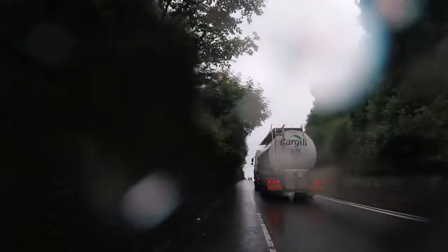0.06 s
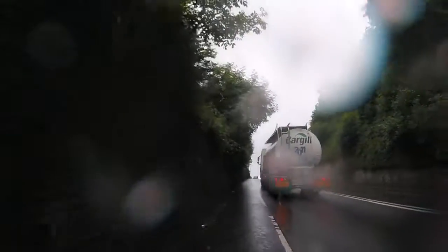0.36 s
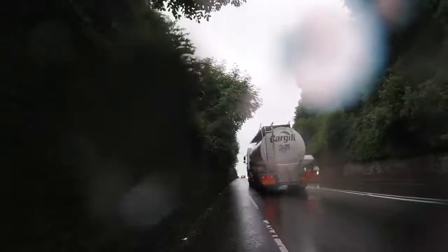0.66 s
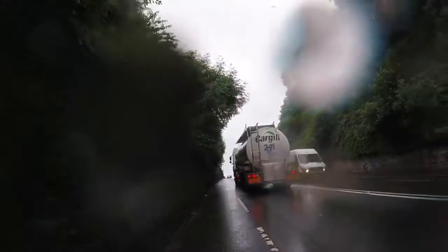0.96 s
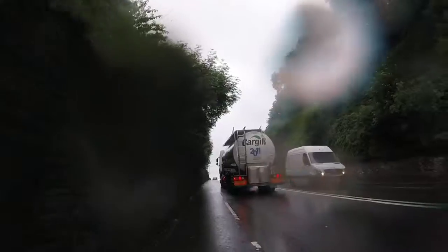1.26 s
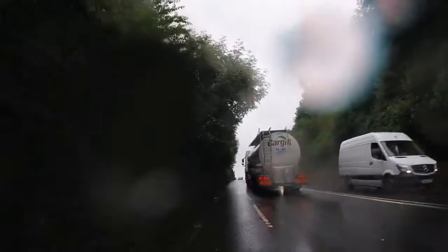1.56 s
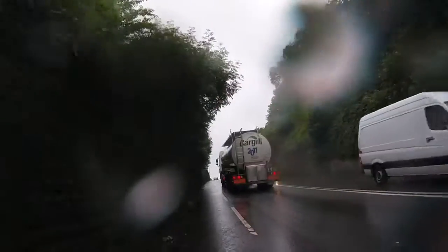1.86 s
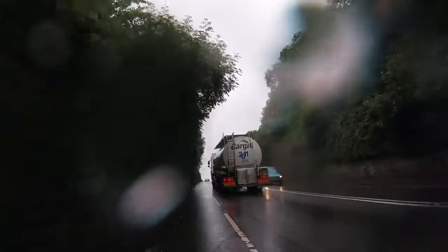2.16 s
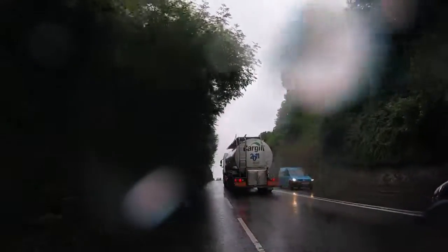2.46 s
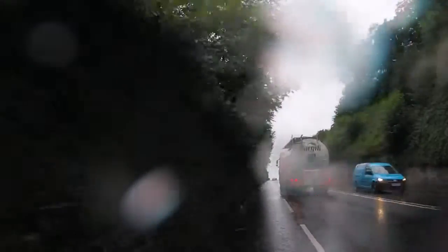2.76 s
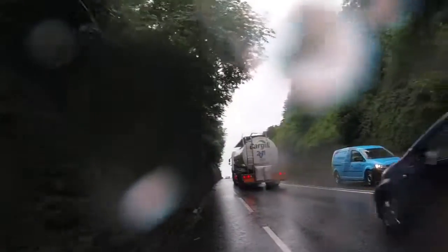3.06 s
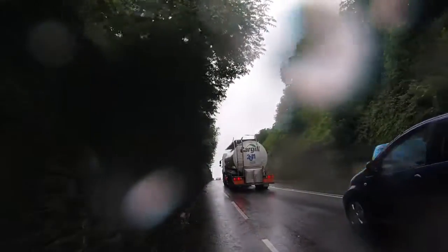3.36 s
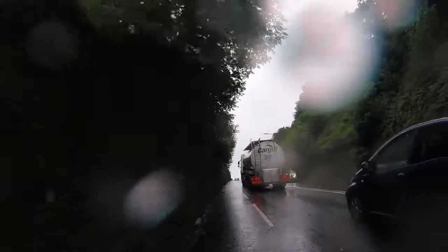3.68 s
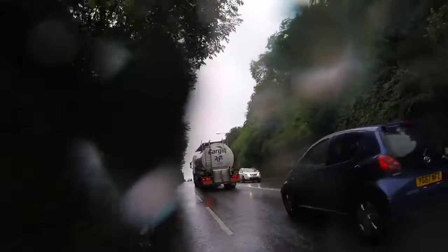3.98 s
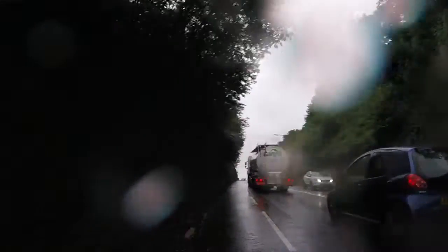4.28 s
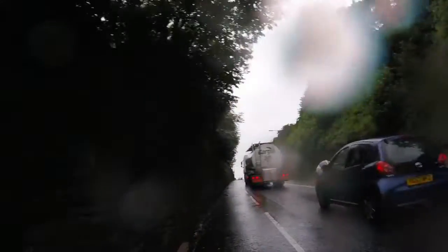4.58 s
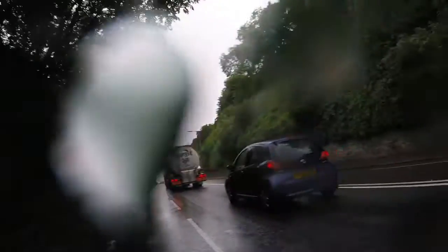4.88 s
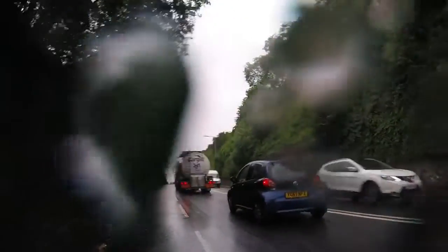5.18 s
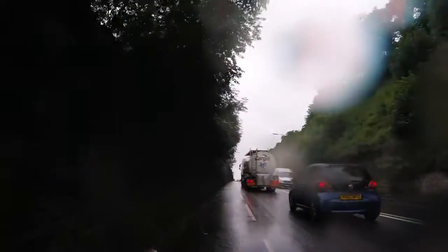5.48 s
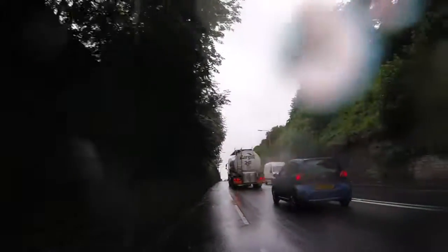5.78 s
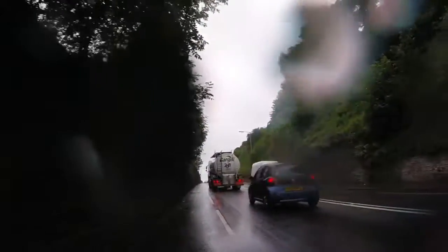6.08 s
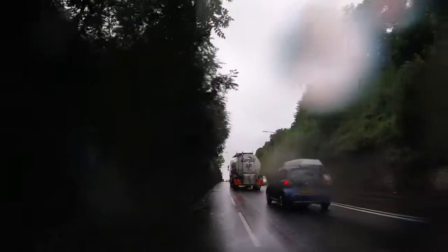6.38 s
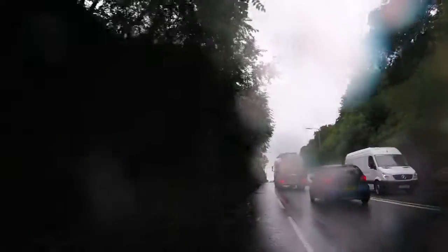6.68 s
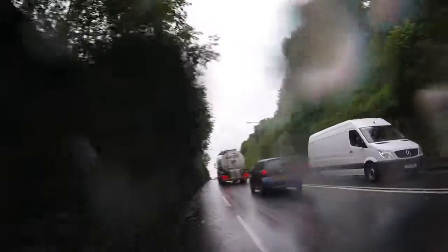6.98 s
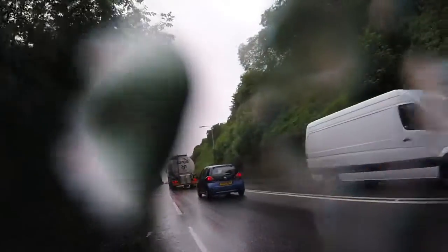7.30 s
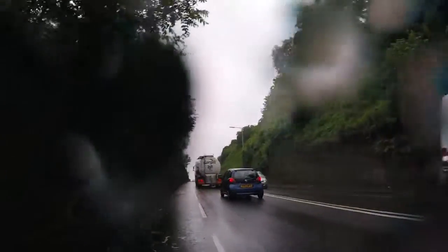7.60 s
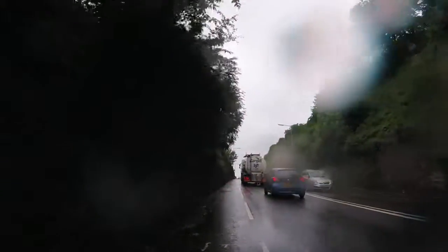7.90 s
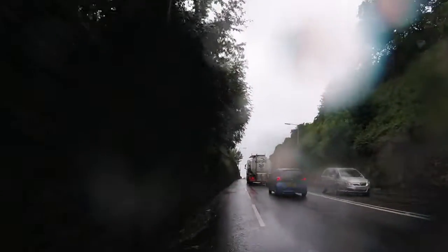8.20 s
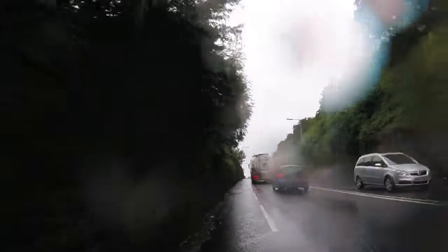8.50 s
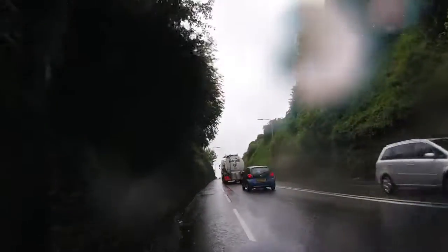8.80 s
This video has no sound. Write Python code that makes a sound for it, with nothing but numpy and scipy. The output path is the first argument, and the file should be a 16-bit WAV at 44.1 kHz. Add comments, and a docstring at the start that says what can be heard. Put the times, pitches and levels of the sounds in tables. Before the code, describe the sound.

Tyres hiss and roar by on wet asphalt over the throbbing low drone, bumps and wind noise of a bike ride.

```python
"""Wet road in rain, from a camera microphone on a moving bicycle. From the start rough asphalt makes the
frame rumble and the camera mount drone, wind buffets the microphone, and a lorry's tyres roar ahead.
A raindrop hits the housing at 1.8 s as a van passes close; bumps thump at 2.2 s and the level dips.
A small van and cars follow, throwing hissing spray, a big car very close at 5.5 s. Around 7 s come
a second drop, a long van and more bumps with another dip; two last cars go by."""
import sys
import numpy as np
from scipy import signal
from scipy.fft import rfft, irfft, next_fast_len
from scipy.io import wavfile
from scipy.ndimage import uniform_filter1d, minimum_filter1d, map_coordinates

SR = 44100
rng = np.random.default_rng(int(sys.argv[2]) if len(sys.argv) > 2 else 0)


def waveform_to_disk(signal):
    """Save audio, clipped to [-1, 1], as 16-bit WAV at the path in sys.argv[1]."""
    frames = np.transpose(np.atleast_2d(signal))
    scaled = np.clip(frames, -1, 1) * 32767
    samples = np.round(scaled).astype(np.int16)
    wavfile.write(sys.argv[1], SR, samples)


N = 399105
TIME = np.arange(N) / SR

# low end of the ride: t/s, relative wind level/dB, relative frame level/dB
RIDE_LEVELS = [(0.0, -17.5, -22), (0.4, -17, -16), (0.64, -13, -21.5), (0.95, -15.5, -17.5),
               (1.15, -23, -17), (1.68, -19, -24.5), (2.24, -22.5, -17.5), (2.48, -19, -27),
               (2.64, -25.5, -18.5), (3.12, -19, -19), (3.6, -21.5, -26), (3.76, -23, -14.5),
               (4.8, -18, -19), (6.4, -19, -19), (7.0, -21, -22.5), (7.2, -19.5, -18), (7.44, -29.5, -34),
               (7.8, -23, -23), (8.3, -24.5, -24), (8.65, -23.5, -23.5), (9.05, -22, -22.5)]
# gusts and lulls on the microphone: t/s, half length/s, lift/dB
WIND_GUSTS = [(0.55, 0.046, 3.5), (1.72, .07, 4), (3.52, 0.038, 5), (5.38, 0.041, 6), (5.48, 0.035, -13),
              (6.07, 0.042, 2.5), (6.5, 0.059, 1.5), (8.65, 0.073, 4)]
# eddies on the microphone: t/s, half length/s, level/dB
WIND_EDDIES = [(0.3, 0.046, -22), (0.74, .05, -17.5), (0.95, .04, -24), (3.158, 0.049, -19),
               (5.37, .04, -25), (8.58, .06, -33)]
# spectra of the head wind and of the eddies: f/Hz, relative density/dB
WIND_SPECTRUM = [(10, -31), (22, -12.5), (32, -13), (45, -12), (55, -4), (66, -0.5), (77, -13.5),
                 (105, -19.5), (125, -9), (148, -20), (175, -8), (300, -35.5), (800, -73)]
EDDY_SPECTRUM = [(12, -21), (24, -4), (36, 0), (50, -12), (90, -24), (300, -44)]
# resonances of the bicycle frame: f/Hz, width/Hz, relative level/dB
FRAME_MODES = [(99.4, 5.4, -2.5), (113.3, 15, -7.5)]
# ripples in the road that shake the frame: t/s, half length/s, lift/dB
FRAME_SHUDDERS = [(0.41, 0.036, 7), (1.217, 0.056, 3), (1.45, 0.061, 13), (1.93, .045, 6), (2.7, .05, 1),
                  (3.39, 0.041, 8), (5.1, .1, 4), (6.12, .04, 4.5), (6.32, .04, 6), (6.77, 0.071, 10),
                  (8.5, .04, 4)]
# raindrops on the camera housing: t/s, splat level/dB, ring level/dB, ring f/Hz
RAINDROPS = [(1.8211, -13, -11, 6550), (6.8256, -10.5, -10.5, 6750)]
# tyres going by, a row per vehicle, axle or trail of spray: closest t/s, half length/s, roar f/Hz,
# whine f/Hz, whine width/Hz, then level/dB when closest of roar, whine, rumble, spray and mist
TYRE_PASSES = [(0.119, .3, 900, 908, 170, -45.5, -51, -35, -35, -52),
               (0.618, .24, 900, 881, 172, -43, -47.5, -33.5, -33.5, -51.5),
               (1.25, .16, 860, 862, 130, -40, -36, -45, -33.5, -53),
               (1.6, .16, 900, 890, 110, -40, -33.5, -44, -34.5, -49),
               (1.86, .17, 1100, 1050, 199, -35, -34, -38, -31.5, -47.5),
               (2.06, .14, 950, 885, 120, -38, -34, -38, -38, -53.5),
               (2.68, .22, 900, 832, 110, -42, -35.5, -39, -40, -64),
               (3.08, .28, 1099, 894, 149, -39.5, -40.5, -40.5, -37, -57),
               (4.08, .32, 1051, 1082, 155, -38, -38, -31.5, -31.5, -55.5),
               (4.532, .24, 1081, 1067, 85, -41, -32.5, -48.5, -33.5, -57),
               (4.86, 0.1202, 1000, 1077, 100, -44, -44.5, -39, -34, -56),
               (5.2, .1, 1150, 1093, 170, -35, -33, -33, -31, -47.5),
               (5.46, .2, 1070, 1052, 154, -33.5, -31, -33, -30, -40),
               (5.799, .18, 900, 929, 140, -35, -32.5, -31.5, -32, -59.5),
               (6.06, .14, 1050, 981, 120, -36, -34.5, -34.5, -35, -50.5),
               (6.23, .16, 1110, 1169, 150, -38, -35, -39, -36, -51),
               (6.65, .18, 950, 942, 140, -37.5, -34.5, -36, -34.5, -53),
               (7.0, .16, 1150, 1452, 130, -37.5, -38.5, -33.5, -37.5, -52.5),
               (7.781, .27, 800, 759.5, 140, -40, -36, -50.5, -45, -56),
               (8.3, .22, 1200, 1100, 220, -42, -41, -55, -55, -62),
               (8.951, .2, 852, 692, 150, -37.5, -41.5, -40.5, -39, -50)]
# spectra of tyre rumble, spray and fine mist: f/Hz, relative density/dB
RUMBLE_SPECTRUM = [(120, -30), (280, -1.5), (325, -7.5), (368, 4), (405, -0.5), (437, 3.5), (470, 0),
                   (570, -3.5), (680, -5), (850, -4), (1400, -9), (3000, -41.5)]
SPRAY_SPECTRUM = [(300, -25.5), (700, -4.5), (1300, -2), (1650, 1.5), (2200, 1), (3000, -0.5), (4100, -4),
                  (5100, -3.5), (5800, -1), (6200, -7.5), (6500, -4), (7000, -14), (8500, -21),
                  (11000, -51.5)]
MIST_SPECTRUM = [(3000, -21.5), (6000, 2), (7700, -1.5), (8700, -5), (10000, -12.5), (11100, -16.5),
                 (11800, -43.5), (14000, -79.5)]
# bumps under the bicycle: t/s, ring gain/dB, scuff gain/dB, tilt/(dB per octave)
ROAD_BUMPS = [(2.135, -6.5, -19, 0), (2.183, -1, 0, 1), (2.212, 4, -3, 0), (4.677, -4, -24, -11),
              (6.904, -1.5, -17, -7), (7.166, 3.5, 5, 0)]
# the mount's ring after a bump: f/Hz, relative level/dB, t60/s
THUMP_MODES = [(99, -24, 0.053), (218.7, 3.5, 0.11), (250.2, -9, 0.054), (378, -16.5, 0.094),
               (434, -24.5, 0.16), (890, -37, 0.053)]
# main and upper resonances of the camera mount: f/Hz, width/Hz, relative level/dB
MOUNT_MODES = [(207.2, 10.7, 2), (220.2, 15.2, -6)]
UPPER_MODES = [(234.9, 10.6, 0), (275.5, 11.8, 0)]
# the mount's drone on ordinary asphalt: t/s, level/dB
DRONE_LEVELS = [(0.0, -28), (0.24, -20.5), (0.7, -21.5), (1.1, -21.5), (1.5, -20), (1.68, -25.5),
                (1.84, -20.5), (2.08, -21.5), (2.26, -20), (2.55, -22), (3.02, -24), (3.3, -20), (4.5, -20),
                (5.4, -20), (5.85, -21), (6.24, -15.5), (6.8, -17), (6.97, -23.5), (7.22, -15), (7.47, -25),
                (7.9, -21.5), (8.3, -19.5), (9.04, -19)]
# ringing of its upper resonances: t/s, relative level/dB of the lower one, of the higher one
UPPER_LEVELS = [(0.0, -28, -28), (0.28, -18, -30), (0.45, -23, -30), (1.0, -25.5, -32.5), (1.5, -28, -31),
                (2.2, -27, -27.5), (2.6, -22.5, -39.5), (2.95, -30.5, -31), (3.28, -18, -32),
                (3.7, -26, -44), (4.05, -21.5, -29.5), (4.3, -18, -32), (4.8, -23.5, -34), (5.1, -20, -28),
                (5.38, -16.5, -29), (5.65, -23, -26), (6.25, -20.5, -31.5), (6.6, -23.5, -28.5),
                (7.2, -27, -26.5), (7.6, -33, -37), (7.85, -32, -38), (8.05, -30, -29), (8.6, -30, -33),
                (9.0, -22.5, -32)]
# rough asphalt that makes the mount hum: t/s, half length/s, level/dB, f/Hz
ROUGH_PATCHES = [(0.083, 0.02, -13.5, 210.7), (0.273, 0.019, -11, 221.7), (0.392, 0.03, -12, 200.9),
                 (0.57, 0.019, -17, 208.3), (0.631, 0.016, -13, 218.8), (0.723, 0.027, -14, 208),
                 (0.849, 0.021, -11.5, 207.2), (0.956, 0.031, -13, 213.3), (1.22, 0.044, -10.5, 208.8),
                 (1.518, 0.028, -13.5, 213), (2.716, 0.016, -11, 223.4), (2.867, 0.066, -12.5, 208),
                 (3.133, 0.029, -10.5, 208.6), (3.275, .033, -12, 217.8), (3.693, .03, -9.5, 206.3),
                 (3.785, 0.025, -13.5, 206.4), (4.332, 0.047, -11.5, 215.3), (4.552, .028, -15, 209),
                 (4.856, 0.024, -15, 215), (5.153, .02, -12.5, 217.4), (5.217, 0.028, -13, 227),
                 (5.368, 0.029, -15, 223.3), (5.598, 0.023, -12.5, 208.5), (5.795, .018, -10, 217),
                 (5.87, .02, -14, 211), (6.066, 0.021, -12.5, 218.5), (6.148, 0.026, -11.5, 220.8),
                 (6.214, 0.031, -12.5, 214.6), (6.314, 0.054, -11.5, 214.2), (6.565, 0.024, -13, 214.4),
                 (6.668, 0.077, -11, 213), (6.818, 0.042, -11, 211.8), (7.678, 0.046, -13.5, 201.5),
                 (8.068, 0.049, -11, 207.7), (8.217, 0.042, -10, 207.3), (8.46, 0.027, -12, 209.6),
                 (8.562, 0.021, -14.5, 212.6), (8.614, 0.035, -11.5, 208.3), (8.789, 0.022, -12, 214),
                 (8.9, .018, -9.5, 211.2), (8.948, 0.015, -11.5, 215), (8.996, 0.017, -12.5, 213)]
# brief dips of the whole level: t/s, nominal depth/dB, fall/s, recovery/s
LEVEL_DIPS = [(2.14, 4.5, 0.043, 0.24), (7.115, 7.5, 0.0089, 0.14)]

FLUTTER_DB, FLUTTER_PER_S = 1.2, 7  # wind and frame rumble waver at random
DROP_PUSH_DB, DROP_PUSH_S = -11, 0.00094
FAR_RUMBLE_DB, FAR_ROAR_DB, FAR_SPRAY_DB, FAR_MIST_DB = -34.5, -37.5, -36.5, -50  # distant traffic
DOPPLER = .05  # share by which the tread pitch lies higher coming and lower going
FALLOFF, WHINE_FALLOFF, MIST_FALLOFF = 1.4, 1.88, 1.2  # powers of distance by which the sounds fade
ROAR_WIDTH_HZ, WHINE_STEEPNESS = 770, 1.38
THROB_DB, THROB_PER_S = 4.2, 22  # the drone's random throbbing
HUM_WAVER_HZ, HUM_WAVER_PER_S = 5.16, 45
PEAK_LIMIT, TOP_HZ = .78, 15500


def amp(db):
    """Decibels to gain."""
    return 10 ** (np.asarray(db) / 20)


def unit(x):
    """Scale to rms 1."""
    return x / np.sqrt(np.mean(x ** 2) + 1e-20)


def curves(rows):
    """One value per sample for each column after the time."""
    s, *cols = np.transpose(rows)
    return [np.interp(TIME, s, c) for c in cols]


def wobble(rate):
    """A smooth random curve, rate knots a second."""
    return map_coordinates(rng.standard_normal(400), [TIME * rate], mode="wrap")


def swells(s, half_s):
    """Bell-shaped swells, one row per event."""
    return np.exp(-np.minimum(((TIME - s[:, None]) / half_s[:, None]) ** 2, 20))


def lifts(rows):
    """The dB that a table of swells adds over time."""
    s, half_s, lift_db = np.transpose(rows)
    return lift_db @ swells(s, half_s)


def filtered(x, response):
    """x times a response of frequency."""
    size = next_fast_len(N + SR // 2)
    return irfft(rfft(x, size) * response(np.fft.rfftfreq(size, 1 / SR)), size)[:N]


def coloured(x, spectrum):
    """x shaped by points of f/Hz, level/dB on a log axis, at rms 1."""
    f, db = np.transpose(spectrum)
    return unit(filtered(x, lambda hz: amp(np.interp(np.log(hz + 1), np.log(f), db, right=-120))))


def patchy(depth_db):
    """White noise with drifting patches of gain."""
    z = signal.stft(rng.standard_normal(N), nperseg=512)[2]
    field = uniform_filter1d(uniform_filter1d(rng.standard_normal(z.shape), size=6, axis=0), 14, axis=1)
    return unit(signal.istft(z * amp(depth_db * unit(field)), nperseg=512)[1][:N])


def evened(x, span_s):
    """x with its swells slower than span_s taken out."""
    power = uniform_filter1d(uniform_filter1d(x * x, int(span_s * SR)), int(span_s * SR))
    return unit(x / np.sqrt(np.abs(power) + 1e-6))


def shaken(modes, skirt):
    """Resonances driven by the grain of the asphalt; the soft tyres pass little far from each."""
    out = np.zeros(N)
    for centre, width, db in modes:
        ring = lambda f, w: 1j * f * w / (centre ** 2 - f * f + 1j * f * w)
        grain = rng.standard_normal(N)
        out += amp(db) * unit(filtered(grain, lambda f: ring(f, width) * ring(f, skirt * width)))
    return unit(out)


def add(track, s, sound):
    """Mix a sound into the track at time s."""
    part = track[round(s * SR):][:len(sound)]
    part += sound[:len(part)]


def head_wind(level_db):
    """Oncoming air buffets the microphone in gusts and lulls."""
    gust_db = lifts(WIND_GUSTS) + FLUTTER_DB * wobble(FLUTTER_PER_S)
    buffet = evened(coloured(rng.standard_normal(N), WIND_SPECTRUM), span_s=0.067)
    return amp(level_db + gust_db - 3.5) * buffet


def eddies():
    """Now and then an eddy thuds right on the microphone."""
    s, half_s, eddy_db = np.transpose(WIND_EDDIES)
    air = evened(coloured(rng.standard_normal(N), EDDY_SPECTRUM), span_s=0.06)
    return amp(eddy_db) @ swells(s, half_s) * air


def frame_rumble(level_db):
    """Under the camera the frame rumbles at its resonances and shudders over ripples."""
    shudder_db = lifts(FRAME_SHUDDERS) + FLUTTER_DB * wobble(FLUTTER_PER_S)
    return amp(level_db + shudder_db - 4.0) * evened(shaken(FRAME_MODES, skirt=13.0), span_s=0.15)


def raindrops():
    """Next to the microphone each drop gives a sharp splat, a dull push and a short ring of the housing."""
    out, t = np.zeros(N), np.arange(SR // 30) / SR
    rise_s, ring_t60_s = .0003, .009
    impact = t / rise_s * np.exp(1 - t / rise_s)
    splat_band = signal.butter(4, [1900, 8400], "bandpass", fs=SR)
    push = t / DROP_PUSH_S * np.exp(1 - t / DROP_PUSH_S)
    for s, splat_db, ring_db, hz in RAINDROPS:
        splat = signal.lfilter(*splat_band, rng.standard_normal(len(t)) * impact)
        splat *= np.sqrt(np.sum(impact ** 2) / np.sum(splat ** 2))
        ring = np.sin(2 * np.pi * hz * t) * amp(-60 * t / ring_t60_s) * (1 - np.exp(-t / rise_s))
        add(out, s, amp(splat_db) * splat + amp(ring_db) * ring - amp(DROP_PUSH_DB) * push)
    return out


def droplets(per_s, spread_db):
    """Countless tiny splashes of uneven size."""
    hits = rng.random(N) < per_s / SR
    return unit(hits * rng.standard_normal(N) * amp(spread_db * rng.standard_normal(N)))


def tread_roar(centre_hz):
    """Air pumped from the tread: a hump of noise around a gliding centre."""
    hump = lambda f: (f < 9000) / (1 + (f / ROAR_WIDTH_HZ) ** 2)
    a, b = filtered(rng.standard_normal(N), hump), filtered(rng.standard_normal(N), hump)
    phase = 2 * np.pi * np.cumsum(centre_hz) / SR
    return unit(a * np.cos(phase) + b * np.sin(phase))


def tread_whine(gains, pitches_hz, widths_hz, clock):
    """Each tread sings in a narrow band that glides down as it passes the microphone."""
    t = TIME[::8]  # these low bands need only an eighth of the sample rate
    rate = 1 / t[1]
    out = np.zeros(len(t))
    for gain, hz, width_hz in zip(gains, pitches_hz, widths_hz):
        hump = 1 / (1 + (np.fft.fftfreq(len(t), t[1]) / width_hz) ** 2) ** WHINE_STEEPNESS
        band = np.fft.ifft(hump * np.exp(2j * np.pi * rng.random(len(t))))
        phase = 2 * np.pi * np.cumsum(np.interp(t, clock, hz)) / rate
        out += np.interp(t, clock, gain) * unit((band * np.exp(1j * phase)).real)
    return filtered(signal.resample_poly(out, 8, 1)[:N], lambda hz: hz < rate / 2)


def traffic():
    """Tyres near and far rumble, roar and tear up the water film; the whine carries least far."""
    s, half_s, roar_hz, whine_hz, width_hz, *levels = np.transpose(TYRE_PASSES)[:, :, None]
    roar_db, whine_db, rumble_db, spray_db, mist_db = levels
    clock = np.linspace(0, TIME[-1], 900)
    smooth = lambda values: np.interp(TIME, clock, values)
    along = (clock - s) / half_s
    distance = np.hypot(1, along)  # from the microphone, in units of the closest distance
    doppler = 1 - DOPPLER * along / distance
    power = lambda db, falloff: (amp(db) / distance ** falloff) ** 2
    gain = lambda powers, far_db: smooth(np.sqrt(powers.sum(axis=0) + amp(far_db) ** 2))
    roar_power = power(roar_db, FALLOFF)
    # the loudest tyres set the pitch of the roar
    centre_hz = smooth(np.average(roar_hz * doppler, axis=0, weights=roar_power))
    roar = gain(roar_power, FAR_ROAR_DB) * tread_roar(centre_hz)
    whine = tread_whine(amp(whine_db) / distance ** WHINE_FALLOFF, doppler * whine_hz, width_hz, clock)
    rolling = coloured(patchy(depth_db=1.15), RUMBLE_SPECTRUM)
    splash = coloured(patchy(depth_db=0.77) + 0.43 * droplets(per_s=2500, spread_db=4), SPRAY_SPECTRUM)
    fizz = coloured(patchy(depth_db=2.5) + .5 * droplets(per_s=1100, spread_db=2.5), MIST_SPECTRUM)
    rumble = gain(power(rumble_db, FALLOFF), FAR_RUMBLE_DB) * rolling
    spray = gain(power(spray_db, FALLOFF), FAR_SPRAY_DB) * splash
    mist = gain(power(mist_db, MIST_FALLOFF), FAR_MIST_DB) * fizz
    return rumble + roar + whine + spray + mist


def bumps():
    """A bump swells the mount's ring within a cycle, with a dull scuff; rounded bumps ring duller."""
    out, t = np.zeros(N), np.arange(SR // 4) / SR
    swell = 1 - np.exp(-t / .005)
    scuff_band, scuff_t60_s = signal.butter(3, 1300, fs=SR), 0.045
    for s, ring_db, scuff_db, tilt_db in ROAD_BUMPS:
        ring = np.zeros(len(t))
        for hz, level_db, t60 in THUMP_MODES:
            start_db = level_db + tilt_db * np.log2(hz / MOUNT_MODES[0][0]) + rng.normal(0, 1)
            ring += amp(start_db - 60 * t / t60) * np.sin(2 * np.pi * hz * t)
        scuff = signal.lfilter(*scuff_band, rng.standard_normal(len(t))) * amp(-60 * t / scuff_t60_s)
        add(out, s, (amp(ring_db) * ring + amp(scuff_db) * scuff) * swell)
    return out


def camera_mount():
    """Right at the microphone the mount drones on ordinary asphalt and hums firmly on rough patches."""
    s, half_s, patch_db, patch_hz = np.transpose(ROUGH_PATCHES)
    on_patch = swells(s, half_s)
    off_patch = np.clip(1 - on_patch.sum(axis=0), 0, 1)
    pitch_hz = np.interp(TIME, s, patch_hz) + HUM_WAVER_HZ * wobble(HUM_WAVER_PER_S)
    hum = amp(patch_db) @ on_patch * unit(np.sin(2 * np.pi * np.cumsum(pitch_hz) / SR))
    drone_db = curves(DRONE_LEVELS)[0] + THROB_DB * np.tanh(wobble(THROB_PER_S))
    drone = off_patch * amp(drone_db) * evened(shaken(MOUNT_MODES, skirt=3.5), span_s=0.051)
    upper = sum(amp(db - 2.5) * evened(shaken([mode], skirt=3.8), span_s=0.093)
                for mode, db in zip(UPPER_MODES, curves(UPPER_LEVELS)))
    # the drone gives way briefly at each bump, so the thump stands out
    drone_duck = np.prod([1 - .8 * np.exp(-((TIME - at - .01) / .025) ** 2)
                          for at, *_ in ROAD_BUMPS], axis=0)
    return hum + drone_duck * (drone + upper)


def scene():
    """Everything meets at the one microphone on the bicycle."""
    wind_db, frame_db = curves(RIDE_LEVELS)
    ride = camera_mount() + frame_rumble(frame_db) + head_wind(wind_db) + eddies() + bumps()
    return (ride + traffic() + raindrops())[None]


def record(dry):
    """The level dips twice and creeps back; the camera limits peaks and cuts the highest treble."""
    dip_db = sum(depth * np.clip((TIME - s) / fall, 0, 1) * np.exp(-np.maximum(TIME - s, 0) / recovery)
                 for s, depth, fall, recovery in LEVEL_DIPS)
    x = dry[0] * amp(-dip_db)
    needed_gain = np.minimum(1, PEAK_LIMIT / (np.abs(x) + 1e-9))
    limiter_gain = uniform_filter1d(minimum_filter1d(needed_gain, size=601), size=601)
    return filtered(x * limiter_gain, lambda hz: hz < TOP_HZ)[None]


dry = scene()
out = record(dry)
waveform_to_disk(out)
```